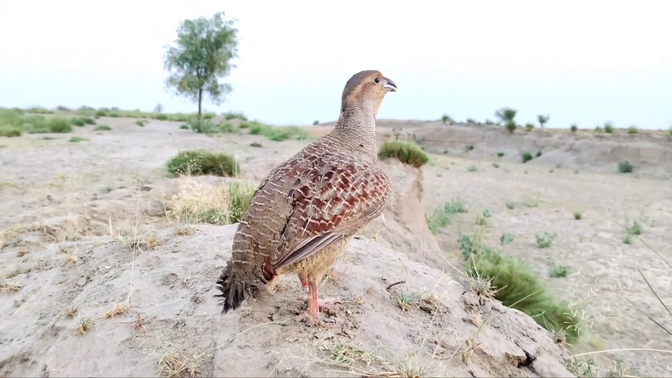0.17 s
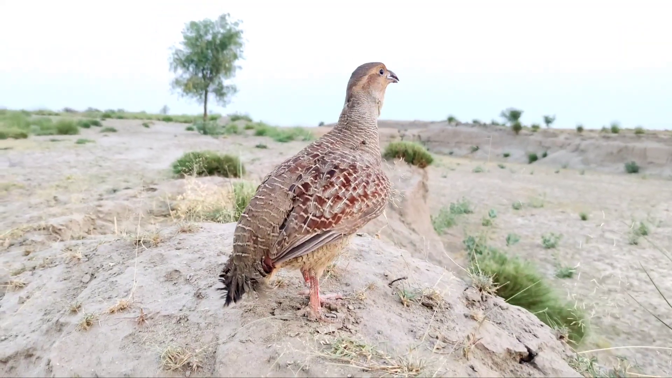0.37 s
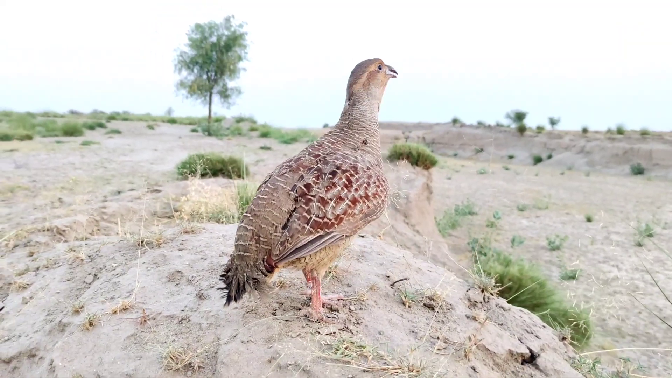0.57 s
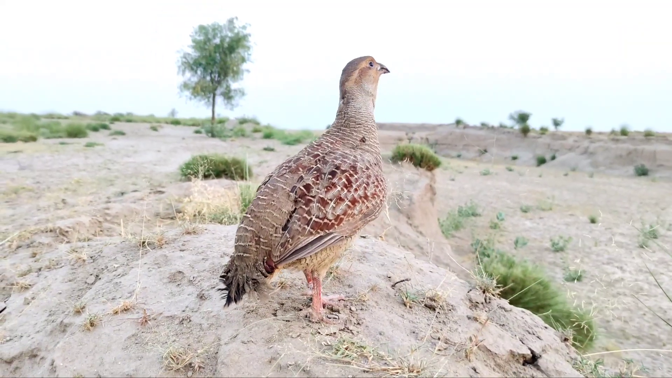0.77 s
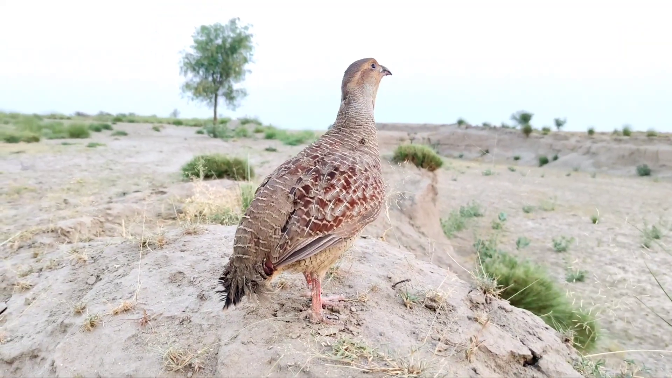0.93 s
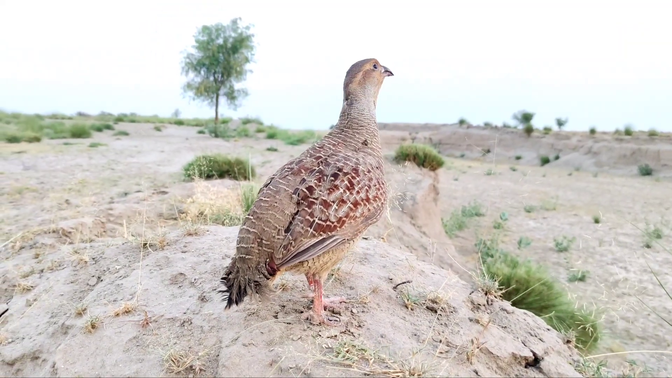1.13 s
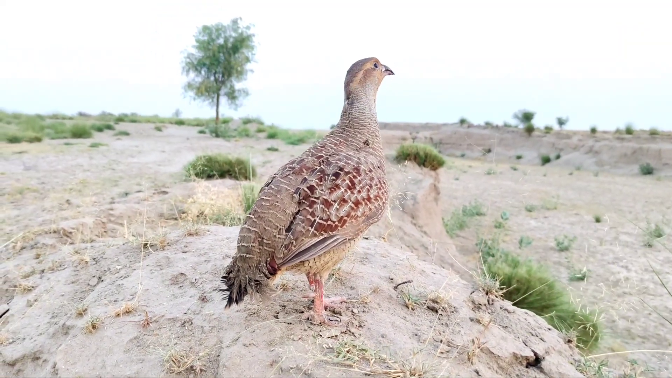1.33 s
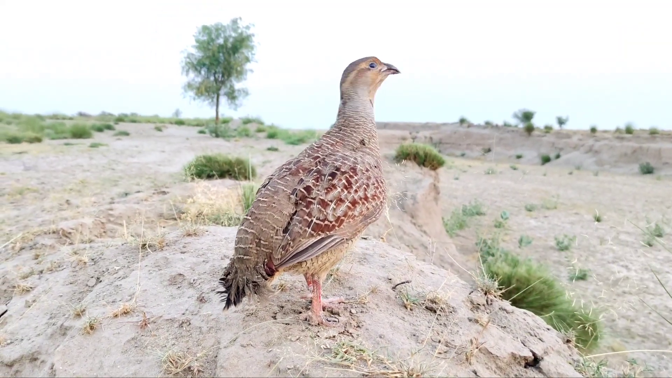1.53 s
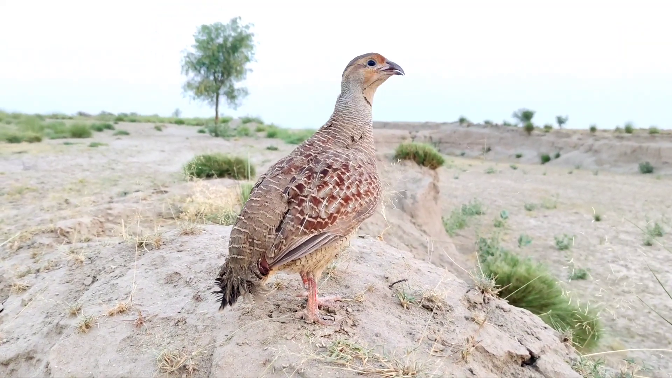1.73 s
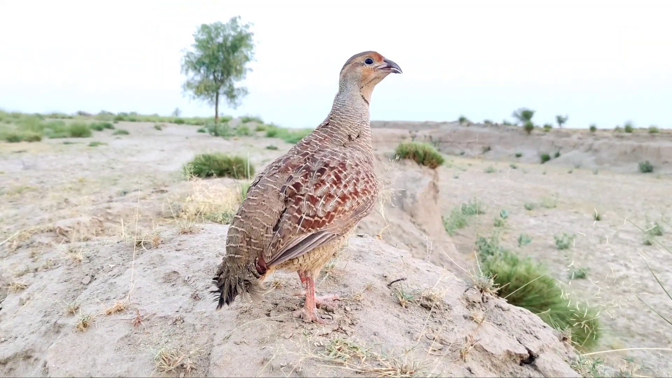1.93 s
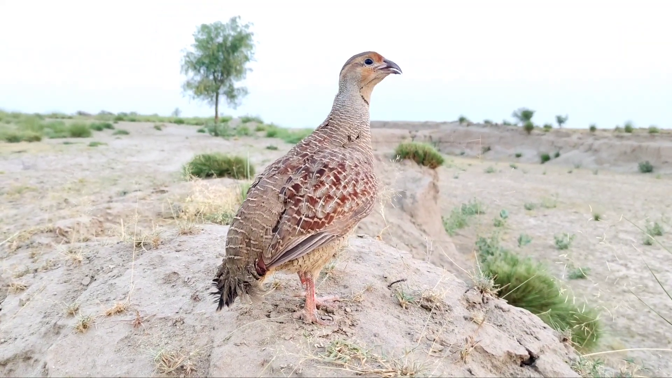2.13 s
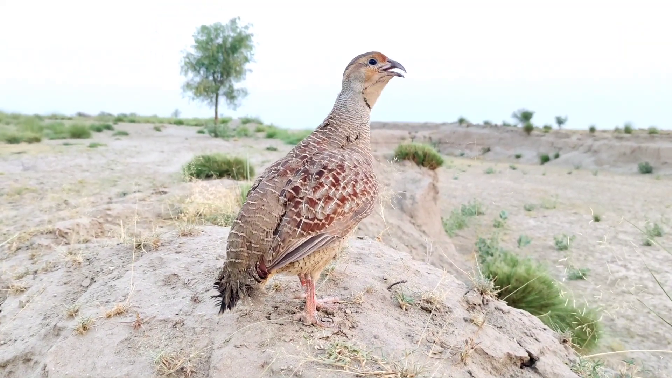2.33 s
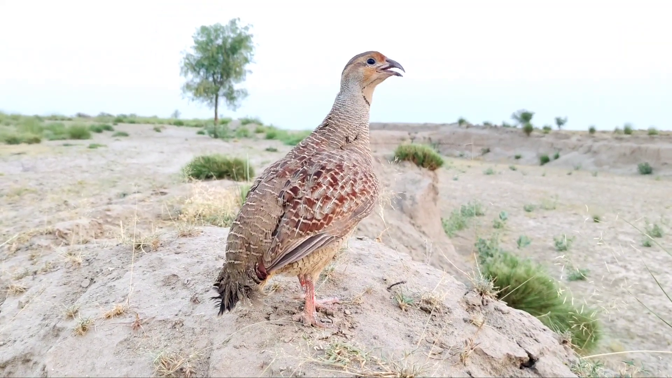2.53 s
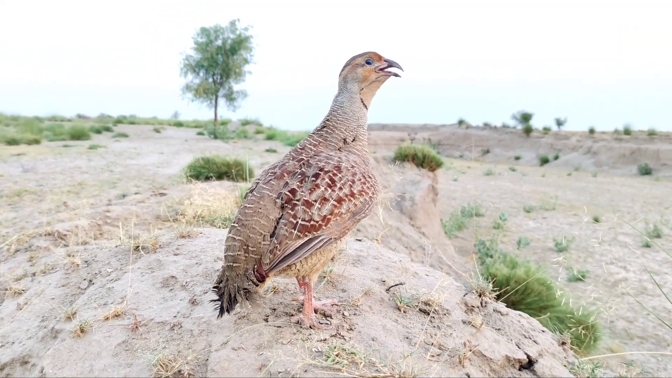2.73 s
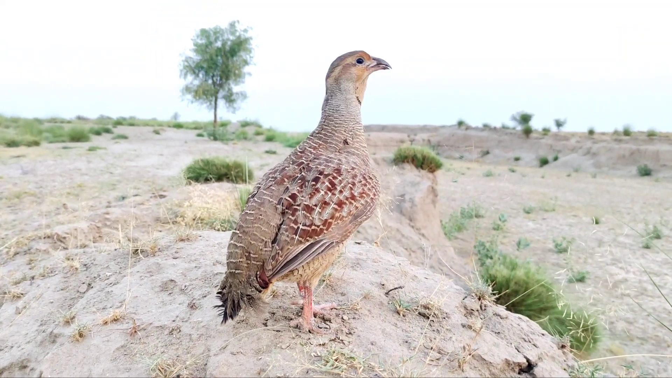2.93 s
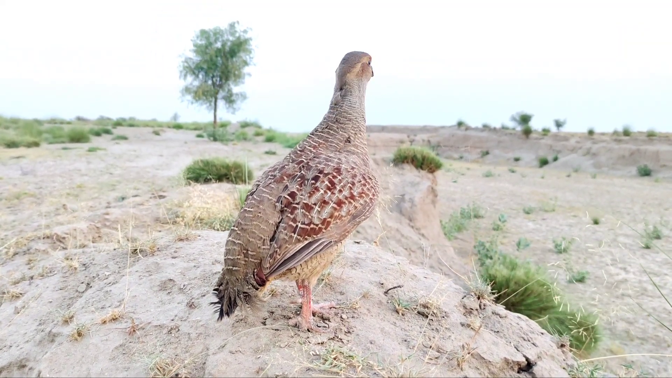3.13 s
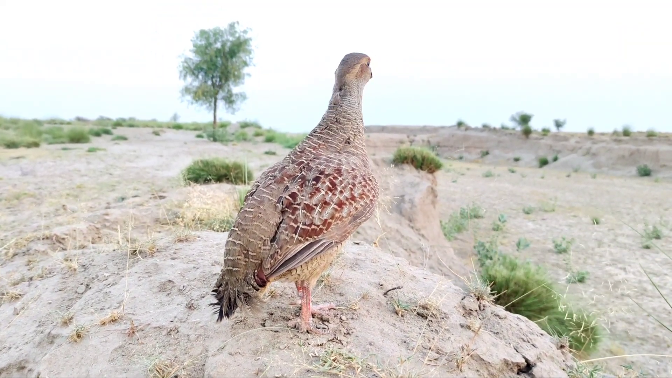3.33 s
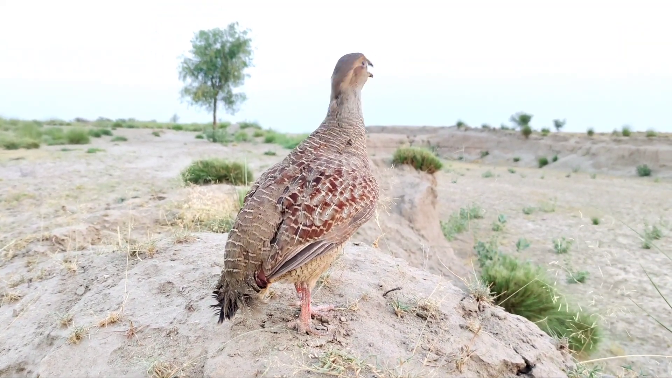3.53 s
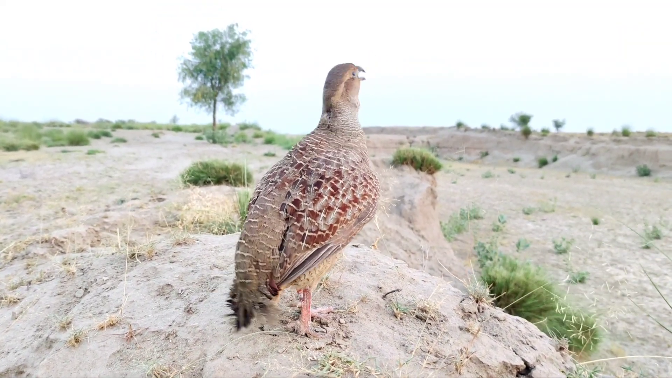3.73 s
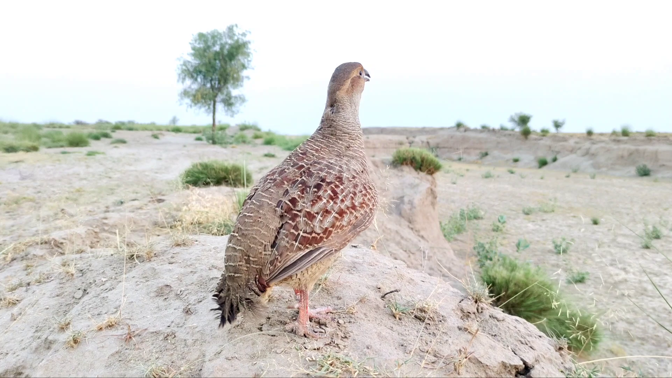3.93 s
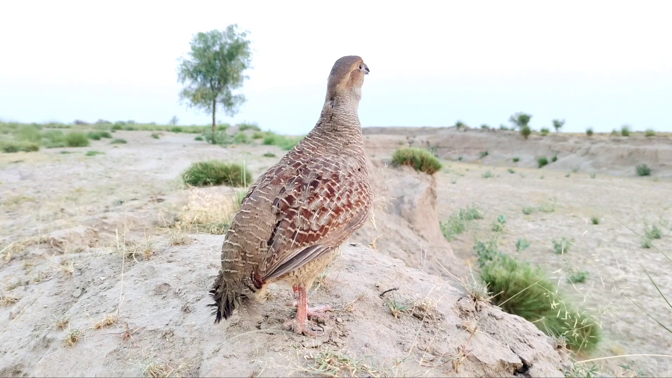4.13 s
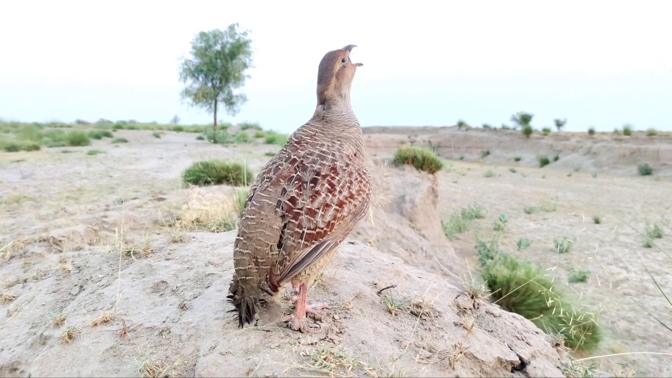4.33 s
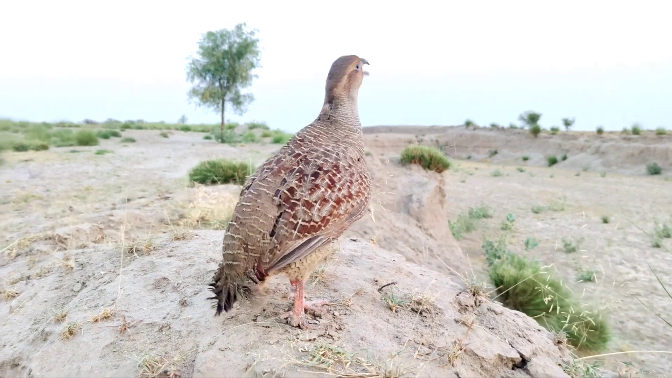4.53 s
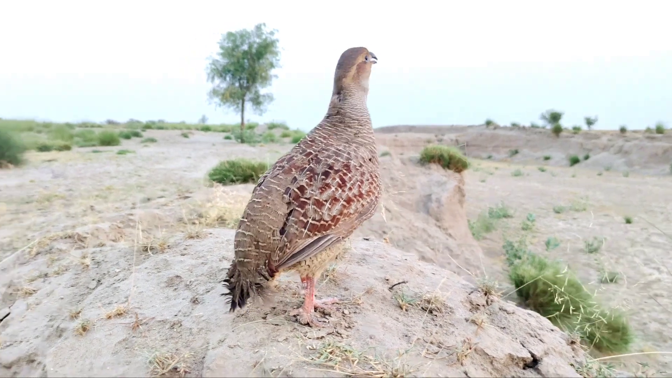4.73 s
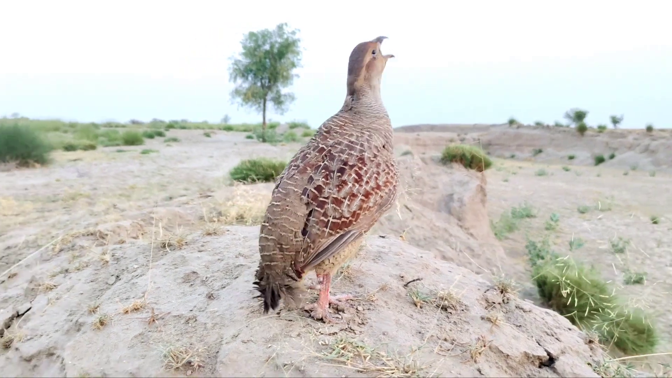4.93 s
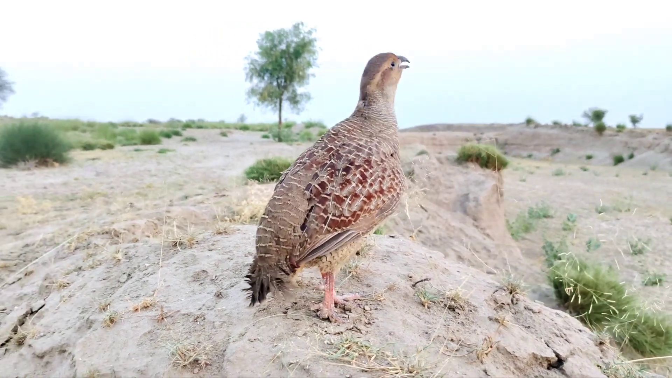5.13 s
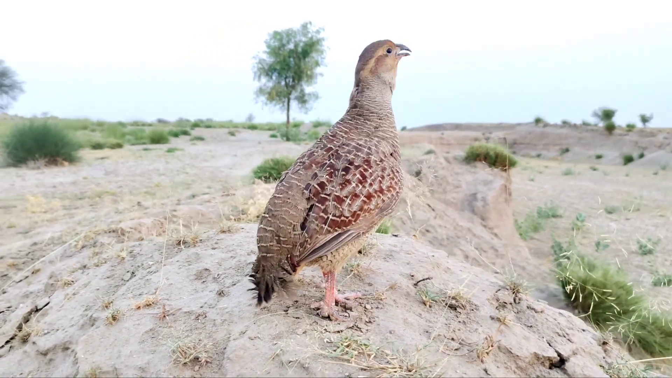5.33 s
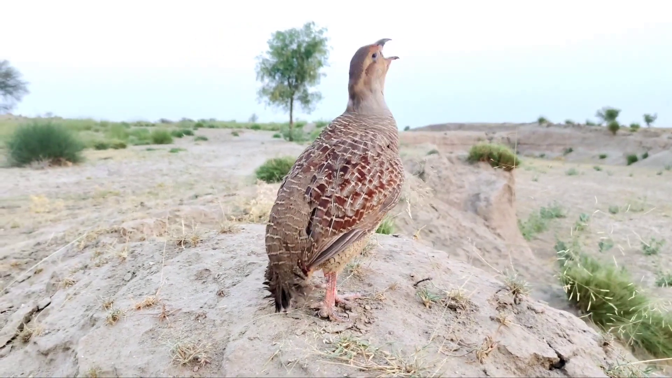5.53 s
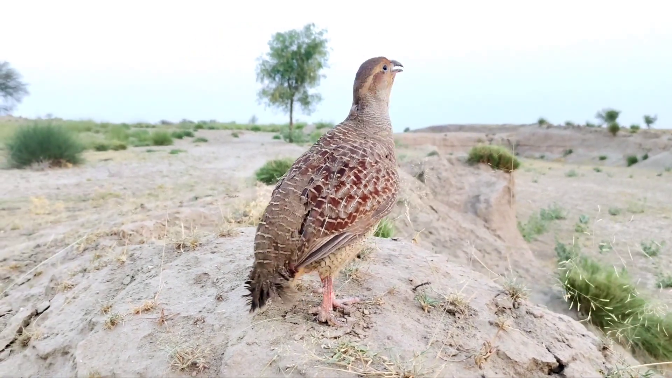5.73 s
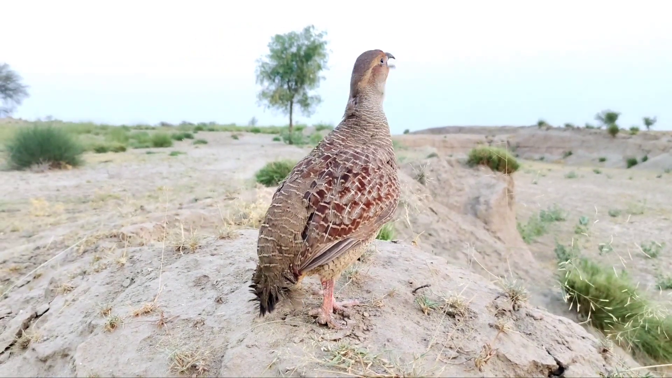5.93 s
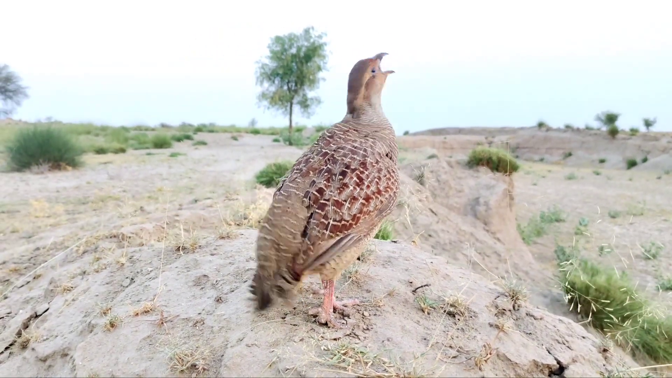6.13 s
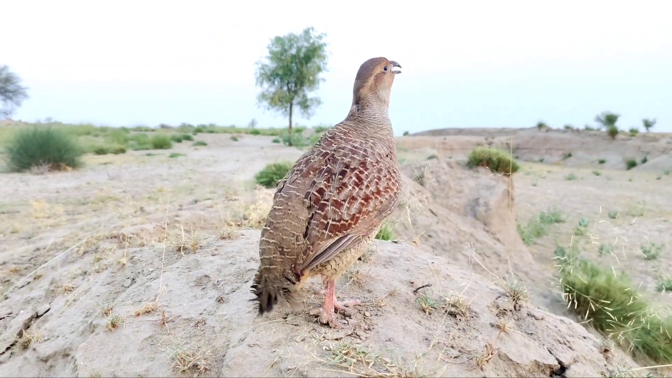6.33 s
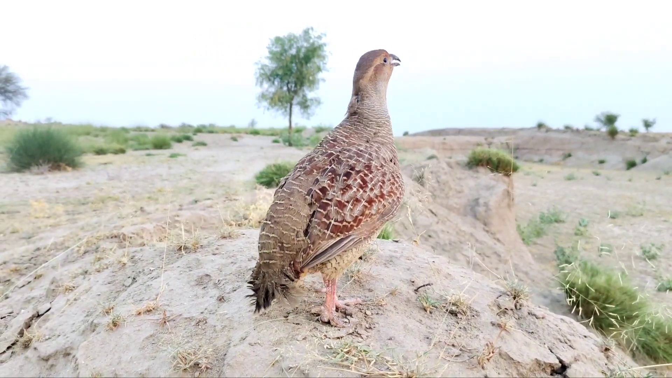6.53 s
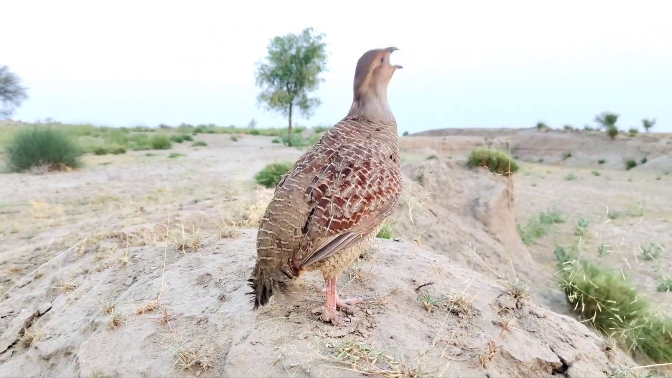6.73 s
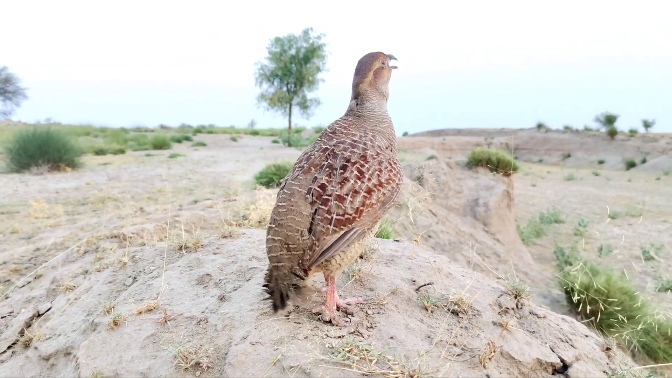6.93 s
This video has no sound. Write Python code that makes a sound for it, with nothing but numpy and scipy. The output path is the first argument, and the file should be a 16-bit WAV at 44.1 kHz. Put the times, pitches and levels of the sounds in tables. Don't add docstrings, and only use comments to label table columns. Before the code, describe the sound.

Close to a handheld phone in open scrub, a francolin-like bird gives a few loud, buzzy-edged low notes, then fading soft clucks, while a second bird lays clear high whistles at regular intervals. Midway the caller bursts into fast, shrill repeated phrases that run to the end, the whistles growing fainter. Light wind, low distant hum and slight outdoor echo surround them.

```python
import sys
import numpy as np
from scipy import signal
from scipy.fft import rfft, irfft
from scipy.io import wavfile
from scipy.ndimage import uniform_filter1d

SR = 44100
rng = np.random.default_rng(int(sys.argv[2]) if len(sys.argv) > 2 else 0)


def pcm_store(signal):
    levels = np.round(np.clip(np.atleast_2d(signal), -1, 1) * 32767)
    wavfile.write(sys.argv[1], SR, levels.astype(np.int16).T)


def undo_db(level):
    steps = np.asarray(level, float) / 20
    return 10 ** steps


N = 308249
HZ = np.fft.rfftfreq(N, 1 / SR) + 1


def on_hz(table):
    hz, value = np.transpose(table)
    return np.interp(np.log(HZ), np.log(hz), value)


def shaped(x, gain):
    return irfft(rfft(x) * gain, N)


def unit(x):
    return x / np.sqrt(np.mean(x ** 2, axis=-1, keepdims=True))


def wobble(rate_hz):
    return unit(shaped(rng.standard_normal(N), 1 / (1 + (HZ / rate_hz) ** 2)))


def span(start_s, length_s):
    i = np.arange(int(start_s * SR), min(int((start_s + length_s) * SR), N))
    return i, np.clip((i / SR - start_s) / length_s, 0, 1)


def air():
    # (frequency [Hz], density [dB per Hz])
    air_colour = [(15, -58), (25, -29), (48, -14.5), (96, -6.5), (198, -12), (233, -26), (267, -19.5),
                  (495, -27), (3090, -34.5), (3930, -32.5), (5280, -43.5), (15500, -40)]
    # (frequency [Hz], likeness [0-1])
    air_likeness = [(60, 0), (130, 0.2), (290, 0.8), (640, 0.4), (1410, 0.05), (3100, 0.3), (6820, -0.0),
                    (15000, -0.0)]
    level_db, right_over_left_db = -58.5, 2.6
    like = np.clip(on_hz(air_likeness), 0, 1)
    colour = undo_db(on_hz(air_colour))
    mid, side = rng.standard_normal((2, N))
    mid = shaped(mid, colour * np.sqrt(1 + like))
    side = shaped(side, colour * np.sqrt(1 - like))
    pair = np.array([mid + side, mid - side])
    bass = shaped(pair, 1 / (1 + (HZ / 250) ** 4))
    pair = pair + bass * (undo_db(2.5 * wobble(3)) - 1)
    gusts = undo_db(0.4 * wobble(0.99))
    balance = undo_db(right_over_left_db * np.array([[-0.5], [0.5]]))
    return undo_db(level_db) * unit(pair) * gusts * balance


def mate():
    # (time [s], pitch [Hz], level [dB])
    whistles = [
        [(0, 3300, -14.5), (.048, 3350, -19.5), (.06, 3447, -37), (.08, 3350, -52)],
        [(.495, 3200, -41), (.503, 3221, -18.5), (.518, 3352, -18), (.626, 3380, -14.5), (.7, 3457, -19.5),
         (.716, 3450, -35), (.745, 3350, -53.5)],
        [(1.125, 3206, -49.5), (1.147, 3344, -14), (1.165, 3483, -15), (1.245, 3471, -13.5), (1.345, 3665, -19),
         (1.355, 3640, -35.5), (1.41, 3460, -57.5)],
        [(1.95, 2780, -45), (1.966, 2738, -29.5), (1.98, 2763, -21.5), (2.008, 2814, -22), (2.112, 2811, -22),
         (2.146, 3000, -39), (2.17, 2960, -60.5)],
        [(2.715, 3260, -46), (2.734, 3422, -12), (2.79, 3678, -13), (2.862, 3615, -13.5), (2.885, 3750, -18.5),
         (2.93, 3870, -60)],
        [(3.51, 3400, -45.5), (3.524, 3405, -18), (3.572, 3540, -13), (3.66, 3538, -11.5), (3.7, 3740, -17),
         (3.72, 3800, -35.5)],
        [(4.2, 3487, -39), (4.216, 3540, -13.5), (4.312, 3693, -18), (4.362, 3727, -14.5), (4.386, 3675, -18.5),
         (4.4, 3676, -34)],
        [(4.86, 3445, -29), (4.882, 3554, -20.5), (4.92, 3576, -21.5), (5.014, 3743, -28.5), (5.03, 3814, -35)],
        [(6.745, 3452, -37), (6.759, 3543, -27), (6.797, 3712, -27.5), (6.86, 3777, -31), (6.91, 3769, -31)],
    ]
    # (time [s], pitch [Hz], level [dB])
    late_whistles = [
        [(5.49, 3250, -55), (5.512, 3434, -27), (5.548, 3585, -23.5), (5.59, 3780, -31.5), (5.64, 3735, -28),
         (5.655, 3700, -48)],
        [(6.12, 3200, -52), (6.135, 3220, -33), (6.17, 3422, -27.5), (6.182, 3360, -43.5)],
        [(6.19, 3546, -54), (6.204, 3650, -27.5), (6.24, 3772, -27), (6.28, 3710, -26.5), (6.295, 3706, -38)],
    ]
    # (left minus right [dB], left leads [radians])
    whistle_place = [(-3.5, 0.2), (-1.4, 0.22), (0.9, 0.52), (0.7, -1.27), (2.5, 1.3), (-0.2, 0.8),
                     (-0.3, -1.36), (-4, -2.0), (-0.5, -2.5), (1, -2.5), (-5.5, -3), (5.5, -2.5)]
    # (frequency [Hz], density [dB per Hz])
    breath = [(250, -13), (500, -9.5), (1200, -4), (2000, -5), (3000, -5), (4300, -4), (6000, -17),
              (9000, -15), (15000, -25.5)]
    hiss_db, octave_db = -27.5, -50
    out, blow = np.zeros((2, N)), np.zeros(N)
    tremble = 1 + 0.004 * wobble(120)
    flutter = undo_db(1.1 * wobble(40) + 0.5 * wobble(300))
    side = np.array([[1], [-1]]) / 2
    for path, (pan_db, lead) in zip(whistles + late_whistles, whistle_place):
        s, hz, db = np.transpose(path)
        i, u = span(s[0], s[-1] - s[0])
        phase = 2 * np.pi * np.cumsum(np.interp(i / SR, s, hz) * tremble[i]) / SR + side * lead
        pan = undo_db(side * pan_db)
        level = undo_db(np.interp(i / SR, s, db)) / np.abs(np.mean(pan * np.exp(1j * side * lead)))
        level *= np.minimum(1, np.minimum(u, 1 - u) * 40)
        tone = np.sin(phase) + undo_db(octave_db) * np.sin(2 * phase)
        out[:, i] += 2 ** 0.5 * level * pan * flutter[i] * tone
        blow[i] = level ** 0.79
    common, own = rng.standard_normal(N), rng.standard_normal((2, N))
    hiss = unit(shaped(common + 0.22 * own, undo_db(on_hz(breath))))
    return out + undo_db(hiss_db) * uniform_filter1d(blow, size=400) * hiss


def throat(modes):
    tract = 0
    for k, (hz, width, db) in enumerate(modes):
        tract = tract + (-1) ** k * undo_db(db) / (1 + 1j * (HZ / hz - hz / HZ) * hz / width)
    tract = tract / (1 + 1j * HZ / 4500) ** 2 / (1 - 1j * 250 / HZ)
    return tract / np.sqrt(np.mean(np.abs(tract) ** 2))


def rattle(table, rate0_hz, rate1_hz, rough, modes, arch=False):
    rate, gain = np.full(N, rate0_hz), np.zeros(N)
    for s, length, db0, db1 in table:
        i, u = span(s, length)
        if arch:
            bend = np.sin(np.pi * u ** 0.72)
            glide = bend
        else:
            bend = np.sqrt(u) if db1 > db0 else u ** 1.13
            glide = u
        rate[i] = rate0_hz + (rate1_hz - rate0_hz) * glide
        gain[i] = np.maximum(gain[i], undo_db(db0 + (db1 - db0) * bend))
    turns = np.cumsum(rate * (1 + 0.12 * rough * wobble(300))) / SR
    at = np.flatnonzero(np.diff(np.floor(turns)) > 0)
    slaps = np.zeros(N)
    uneven_db = 2.5 * rough * np.clip(rng.standard_normal(N)[at], -2, 1)
    slaps[at] = undo_db(uneven_db) * np.sqrt(SR / rate[at])
    puffs = rough * np.exp(-(turns % 1) / 0.5) * rng.standard_normal(N)
    return undo_db(-2) * shaped((slaps + puffs) * gain, throat(modes)), gain


def pure_notes():
    # (time [s], length [s], start [Hz], middle [Hz], end [Hz], peak [dB])
    swells = [(0.4829, 0.014, 1421, 1597, 1617, -10.5), (3.8019, 0.02, 1900, 1698, 1627, -5.5),
              (3.9989, 0.0075, 1635, 1717, 1790, -5.5), (4.0109, 0.013, 1420, 1384, 1315, -6.5),
              (4.1107, 0.01, 1511, 1685, 1730, -7.5), (4.1211, 0.015, 1566, 1435, 1367, -5),
              (4.2389, 0.013, 1433, 1347, 1245, -8), (4.4758, 0.013, 2010, 1909, 1868, -5.5),
              (4.6988, 0.018, 1728, 1637, 1466, -4), (4.8156, 0.014, 1686, 1574, 1487, -4),
              (5.1443, 0.0075, 1438, 1403, 1457, -5.5), (5.3114, 0.018, 1716, 1709, 1504, -4.5),
              (5.4227, 0.01, 1900, 2045, 2180, -11.5), (5.4312, 0.016, 1703, 1667, 1564, -2),
              (5.7724, 0.014, 1469, 1355, 1677, -10.5), (5.936, 0.021, 1638, 1780, 1506, -4.5),
              (6.0577, 0.017, 1630, 1652, 1479, -4), (6.5691, 0.009, 2090, 2028, 1890, -10),
              (6.5775, 0.019, 1725, 1684, 1512, -4), (6.6963, 0.017, 1666, 1613, 1500, -3.5),
              (6.9756, 0.015, 2030, 1848, 1836, -5.5)]
    tails = [(3.8221, 0.023, 2227, 2159, 1930, -17.5), (3.8456, 0.021, 1458, 1315, 1343, -16.5),
             (4.0253, 0.011, 1773, 1747, 1640, -18), (4.1357, 0.015, 1776, 1737, 1548, -19),
             (4.2578, 0.012, 1050, 1042, 1033, -23), (4.715, 0.02, 1950, 1920, 1664, -17.5),
             (4.828, 0.024, 1964, 1903, 1569, -18), (5.1554, 0.014, 1394, 1348, 1314, -21),
             (5.3273, 0.022, 2060, 1994, 1833, -16.5), (5.4468, 0.033, 1955, 1910, 1606, -18),
             (5.957, 0.024, 2113, 1991, 1684, -17), (6.0757, 0.028, 2019, 1912, 1585, -19),
             (6.4202, 0.013, 1290, 1471, 1471, -14), (6.5958, 0.023, 2083, 1997, 1780, -18),
             (6.7118, 0.027, 1977, 1907, 1659, -19.5)]
    held = [
        (0.1371, 0.032, 1809, 1803, 1771, -7),
        (3.742, 0.037, 1841, 1835, 1795, -7.5),
        (4.4236, 0.029, 2403, 2436, 2306, -7),
        (5.0323, 0.026, 2370, 2460, 2231, -6.5),
        (5.6582, 0.027, 2422, 2455, 2221, -9),
        (6.2928, 0.029, 2369, 2477, 2212, -6.5),
        (6.9215, 0.026, 2387, 2470, 2320, -7),
    ]
    fades = [(0.1922, 0.051, 1817, 1467, 1312, -7.5), (4.448, 0.014, 1838, 1900, 1887, -8),
             (4.487, 0.051, 2343, 2296, 1964, -10.5), (4.9318, 0.022, 1595, 1599, 1371, -7),
             (5.0864, 0.06, 2376, 2327, 1917, -8), (5.5555, 0.023, 1658, 1622, 1395, -7),
             (5.713, 0.062, 2394, 2307, 1972, -9.5), (6.1806, 0.029, 1612, 1435, 1414, -7.5),
             (6.3194, 0.013, 1835, 1922, 1935, -8.5), (6.3476, 0.067, 2353, 2342, 1912, -8.5),
             (6.817, 0.024, 1552, 1496, 1367, -8), (6.9466, 0.012, 1873, 1898, 1898, -9)]
    # (share of the note [0-1], level [dB])
    swell_shape = [(0, -4.5), (.3, -2.5), (.75, -1.5), (.9, -3), (1, -7)]
    tail_shape = [(0, 19), (.1, 2.5), (0.501, -0.5), (.9, -6), (1.002, -3.5)]
    held_shape = [(0, 2), (0.101, 0), (.5, 0), (.9, 1), (1, -6)]
    fade_shape = [(0, 1.5), (.15, -1), (.5, -0.5), (.85, -5.5), (1, -18)]
    # (multiple of the pitch, level [dB])
    overtones = [(.5, -50.5), (1.5, -32), (2, -15), (3, -28.5), (4, -31), (5, -29.5), (6, -37.5)]
    # (frequency [Hz], gain [dB])
    beak = [(800, -13.5), (2500, -3), (3500, -3.5), (5000, 3), (6000, -10), (8000, -9), (10000, 6),
            (12500, -8), (15000, -18.5)]
    # (time [s], peak [dB])
    kicks = [
        (4.418, -14.5),
        (5.028, -15),
        (5.056, -3),
        (5.083, -7),
        (5.656, -5.5),
        (5.683, -0.5),
        (5.708, -7),
        (6.291, -9.5),
        (6.346, -11.5),
        (6.919, -14.5),
    ]
    ramp_s = 0.0014
    out, gain = np.zeros(N), np.zeros(N)
    tremble, flutter = 1 + 0.002 * wobble(300), undo_db(0.25 * wobble(250))
    beak_hz, beak_db = np.transpose(beak)
    kinds = ((swells, swell_shape, 1.1), (tails, tail_shape, 1.3), (held, held_shape, 1.1), (fades, fade_shape, 1.6))
    for table, shape, sag in kinds:
        for s, length, *pitch, db in table:
            i, u = span(s, length)
            curve = np.polyfit((np.arange(3) / 2) ** sag, pitch, 2)
            hz = np.polyval(curve, u ** sag) * tremble[i]
            phase = 2 * np.pi * np.cumsum(hz) / SR
            level = undo_db(db + np.interp(u, *np.transpose(shape)))
            level = level * np.minimum(1, np.minimum(u, 1 - u) * length / ramp_s)
            tone = np.sin(phase)
            for k, overtone_db in overtones:
                tone += undo_db(overtone_db + np.interp(k * hz, beak_hz, beak_db)) * np.sin(k * phase + k)
            out[i] += 2 ** 0.5 * level * flutter[i] * tone
            gain[i] += level
    for s, db in kicks:
        i, u = span(s, 0.024)
        swell = 2 * u * np.exp(-4 * u) * (1 - u)
        out[i] += undo_db(db + 11) * swell * np.sin(2 * np.pi * 1880 * i / SR)
    return out, gain


def caller():
    # (time [s], length [s], start [dB], end [dB])
    openings = [(0.0898, 0.019, -33, -8), (0.3602, 0.028, -41, -13), (0.4689, 0.016, -40.5, -13.5),
                (3.6966, 0.022, -23.5, -10), (3.9829, 0.018, -35.5, -16.5), (4.0977, 0.015, -39, -12),
                (4.2144, 0.018, -24, -12.5), (4.382, 0.016, -23, -9), (4.6724, 0.027, -39.5, -7.5),
                (4.7941, 0.023, -29, -14), (4.9158, 0.018, -28.5, -11.5), (4.9996, 0.034, -21.5, -22),
                (5.29, 0.022, -35, -9), (5.4127, 0.012, -37.5, -11), (5.5404, 0.016, -24.5, -11.5),
                (5.6252, 0.035, -27, -18), (5.9175, 0.019, -37, -11), (6.0403, 0.018, -34.5, -9.5),
                (6.166, 0.016, -27.5, -13.5), (6.2618, 0.033, -25.5, -15), (6.5571, 0.013, -35.5, -12),
                (6.6768, 0.023, -37, -8.5), (6.8005, 0.019, -26, -11.5), (6.8883, 0.036, -24.5, -15)]
    bridges = [(0.1068, 0.035, -11.5, -20.5), (0.1686, 0.02, -25.5, -25), (3.7166, 0.027, -15, -20),
               (3.7794, 0.024, -30.5, -23), (4.0059, 0.007, -14, -13), (4.2304, 0.01, -12.5, -19.5),
               (4.2513, 0.0076, -19, -24), (4.396, 0.03, -11, -17), (4.4619, 0.01, -30.5, -29),
               (5.0585, 0.027, -18.5, -29), (5.6841, 0.026, -18, -30), (6.3326, 0.012, -42.5, -17.5),
               (6.9592, 0.017, -34.5, -25.5)]
    closings = [(0.2425, 0.021, -21.5, -41), (0.3868, 0.044, -10, -39.5), (0.491, 0.035, -13, -25.5),
                (3.8607, 0.018, -19, -43.5), (4.0394, 0.017, -23, -49.5), (4.1516, 0.017, -19, -51.5),
                (4.5385, 0.032, -13, -43.5), (4.7347, 0.018, -23, -50.5), (4.852, 0.011, -24, -33),
                (5.1717, 0.007, -35, -54.5), (5.3496, 0.02, -26, -54.5), (5.4769, 0.022, -22.5, -56),
                (5.7868, 0.017, -24, -50.5), (5.9806, 0.012, -19, -46.5), (6.1038, 0.015, -24.5, -54),
                (6.4334, 0.018, -37.5, -43), (6.615, 0.018, -19, -50), (6.7354, 0.0083, -20, -31.5)]
    # (time [s], length [s], edge [dB], peak [dB])
    clucks = [
        (.586, 0.04, -33.5, -20.5),
        (.674, 0.043, -29, -18),
        (.755, 0.043, -35, -20.5),
        (.855, 0.046, -33.5, -23),
        (.968, .052, -39, -28.5),
        (1.085, 0.047, -44, -32.5),
    ]
    # (frequency [Hz], width [Hz], level [dB])
    open_throat = [(800, 1200, -18), (1500, 550, -2), (2000, 360, 2.5), (2750, 710, -1.5),
                   (4400, 1200, -22.5)]
    shut_throat = [(400, 400, -12), (1023, 350, -1.5), (1400, 740, 1.5), (2600, 500, -12.5)]
    cluck_throat = [(386, 300, -10), (950, 280, 1.5), (1400, 350, 2), (2550, 390, -11)]
    # (frequency [Hz], density [dB per Hz])
    leak_colour = [(300, -22.5), (1000, -7.5), (2500, 0.5), (5000, -7.5), (6500, -20), (8000, -16.5),
                   (10500, -13.5), (13000, -16), (15500, -24)]
    # (frequency [Hz], left minus right [dB])
    caller_balance = [(700, -.5), (1500, -3.5), (2350, 0.5), (3200, 12.5), (4700, 10.5), (7000, 2.5),
                      (15000, -1.5)]
    # (frequency [Hz], left leads [radians])
    caller_lead = [(300, 0.5), (1500, 0.16), (2350, 1.41), (3200, -0.36), (4700, -2.5), (7150, -2),
                   (15500, -7.5)]
    notes, note_gain = pure_notes()
    rattles = [rattle(openings, 400.0, 900.0, 1.0, open_throat),
               rattle(bridges, 880.0, 950.0, 0.97, open_throat),
               rattle(closings, 800.0, 480.0, 0.96, shut_throat),
               rattle(clucks, 270.0, 350.0, 0.22, cluck_throat, arch=True)]
    voice = notes + sum(sound for sound, _ in rattles)
    push = uniform_filter1d(undo_db(-6) * note_gain + sum(gain for _, gain in rattles), size=130)
    common, own = rng.standard_normal(N), rng.standard_normal((2, N))
    leak = undo_db(-20.5) * push * unit(shaped(common + 0.5 * own, undo_db(on_hz(leak_colour))))
    half = undo_db(on_hz(caller_balance) / 2) * np.exp(0.5j * on_hz(caller_lead))
    ports = np.array([half, 1 / half])
    return shaped(voice + leak, ports / np.sqrt(np.mean(np.abs(ports) ** 2, axis=0)))


def puffs_and_knocks():
    # (time [s], peak [dB], frequency [Hz], length [s])
    puff_table = [
        (0.294, -35.5, 106.6, 0.0085),
        (1.135, -48.5, 170, .01),
        (1.955, -40, 200, 0.0052),
        (2.23, -45.5, 500, 0.0032),
        (2.715, -41.5, 224.6, 0.0059),
        (2.978, -53, 593, 0.0029),
        (3.499, -44, 198, 0.0074),
        (4.195, -44, 209.3, 0.0084),
        (6.734, -44.5, 100, 0.008),
    ]
    out = np.zeros(N)
    for s, db, hz, length in puff_table:
        i, u = span(s, 4 * length)
        out[i] += undo_db(db) * np.sin(2 * np.pi * hz * 4 * length * u) * 8 * u * np.exp(-5 * u)
    return out


def far_songbird():
    # (time [s], length [s], start [Hz], end [Hz], level [dB])
    far_chirps = [
        (2.27, 0.044, 3800, 4300, -65),
        (2.662, 0.044, 2670, 3500, -75),
        (3.116, .03, 3600, 4000, -71),
        (3.155, .025, 3250, 3780, -65),
        (3.167, 0.024, 3840, 2980, -70.5),
        (3.288, .02, 3830, 4400, -61),
        (3.329, .02, 4240, 3400, -62.5),
        (3.349, 0.058, 3400, 4500, -57),
        (3.397, .02, 4000, 3180, -70),
        (3.41, 0.097, 1220, 1140, -74.5),
    ]
    out = np.zeros(N)
    for s, length, hz0, hz1, db in far_chirps:
        i, u = span(s, length)
        phase = 2 * np.pi * np.cumsum(hz0 + (hz1 - hz0) * u) / SR
        out[i] += undo_db(db) * np.sin(np.pi * u) * np.sin(phase)
    return out


def ground_echo(birds):
    t = np.arange(SR // 2) / SR
    decay = undo_db(-50.5 - 60 * t / 0.12) + undo_db(-75 - 60 * t / 0.25)
    scatter = rng.standard_normal((2, len(t))) * decay
    return signal.fftconvolve(birds.mean(axis=0)[None], scatter, axes=1)[:, :N]


def scene():
    birds = mate() + caller()
    return birds + ground_echo(birds) + puffs_and_knocks() + far_songbird() + air()


def soft_limit(x):
    return x / (1 + (x / 0.99) ** 6) ** (1 / 6)


def roll_off(x):
    return signal.sosfilt(signal.butter(12, 15970, fs=SR, output="sos"), x)


def record(dry):
    mix = soft_limit(shaped(dry, 1 / (1 - 1j * 45 / HZ) ** 2))
    return roll_off(mix)


dry = scene()
out = record(dry)
pcm_store(out)
```